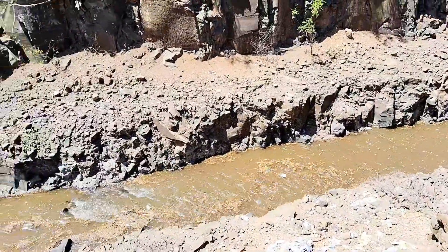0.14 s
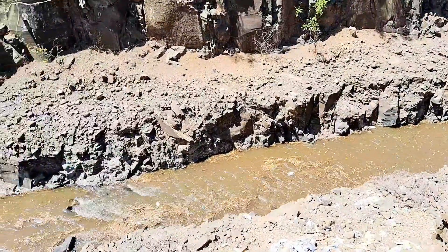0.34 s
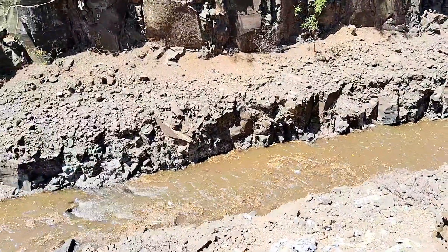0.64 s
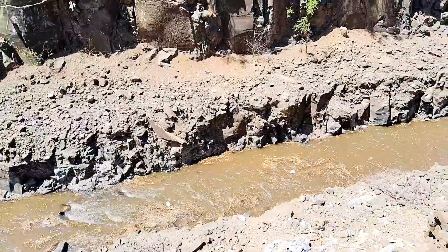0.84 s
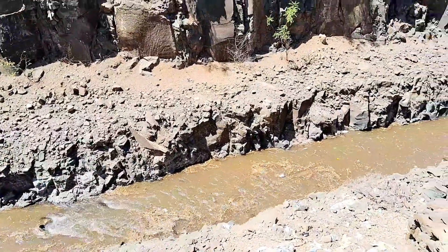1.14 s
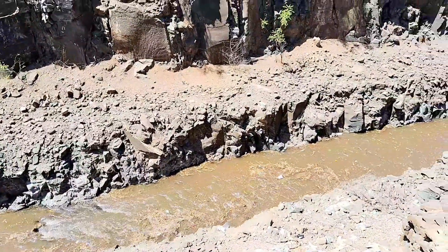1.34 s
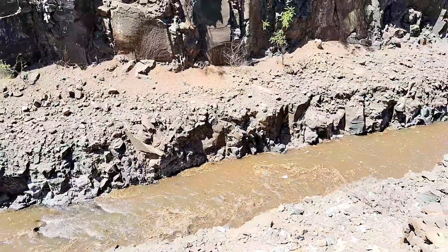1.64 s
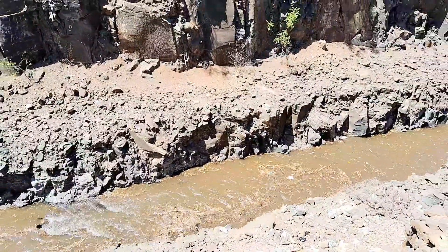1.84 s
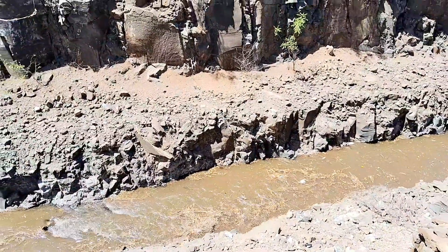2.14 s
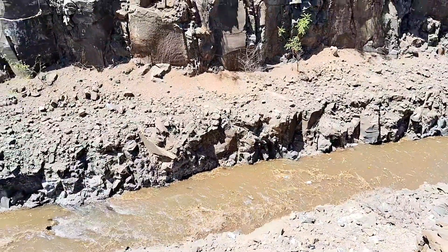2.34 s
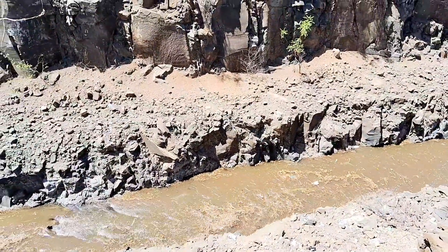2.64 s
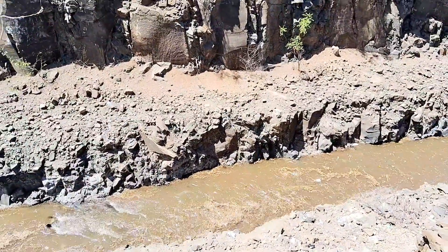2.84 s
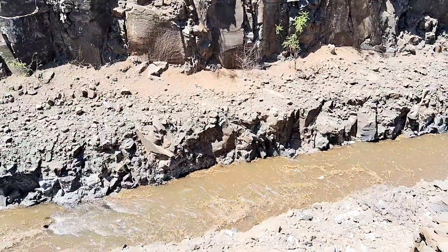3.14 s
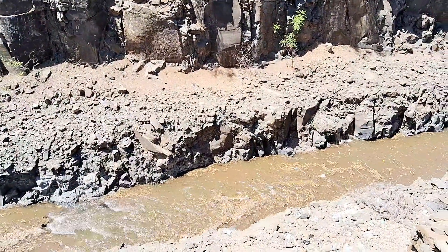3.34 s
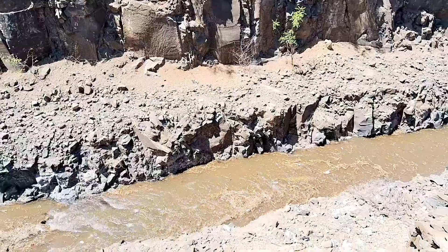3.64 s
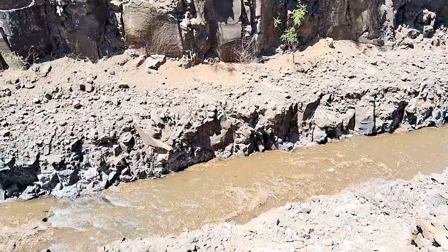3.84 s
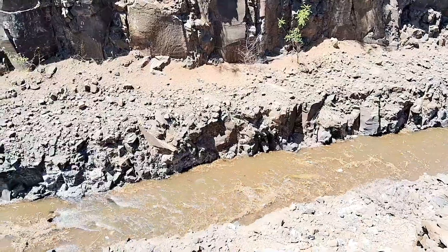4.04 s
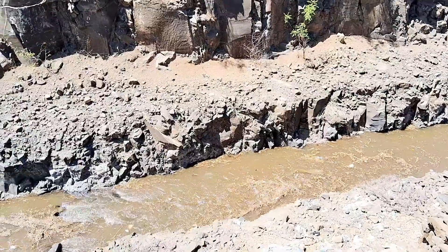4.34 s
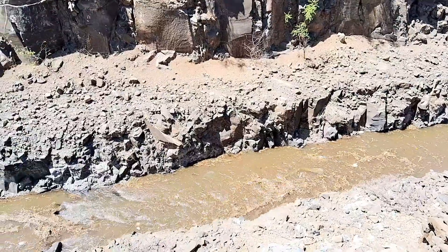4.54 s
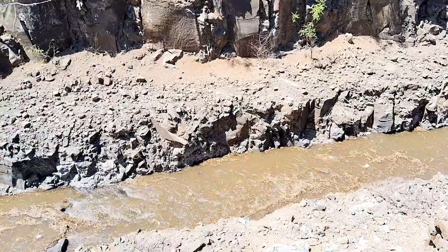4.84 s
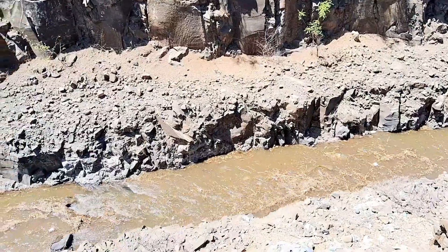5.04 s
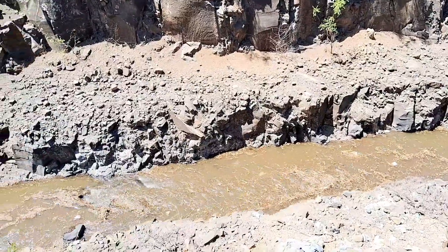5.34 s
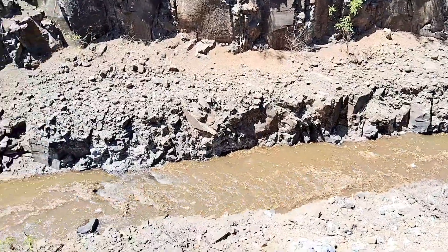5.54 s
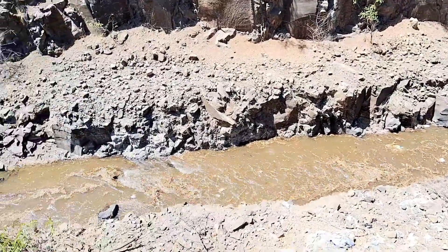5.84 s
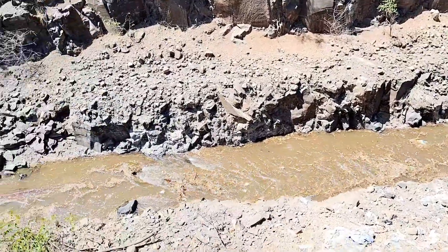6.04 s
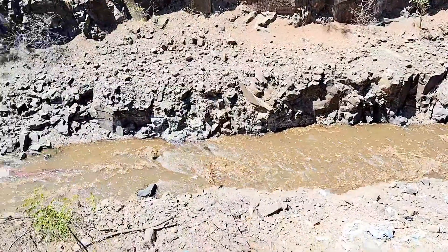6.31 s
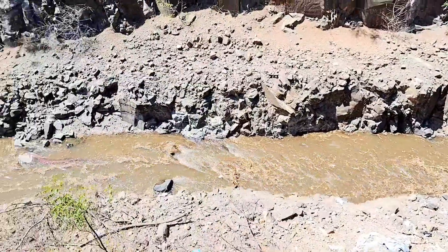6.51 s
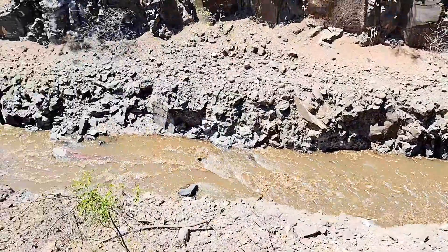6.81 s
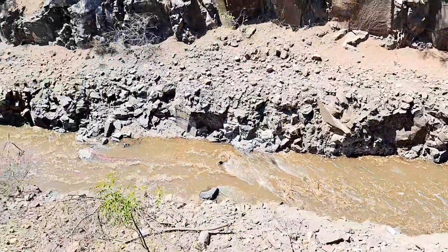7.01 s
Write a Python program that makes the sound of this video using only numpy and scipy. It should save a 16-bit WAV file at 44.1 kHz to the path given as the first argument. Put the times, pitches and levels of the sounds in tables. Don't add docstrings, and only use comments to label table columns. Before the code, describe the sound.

Fast shallow water churns over rocks, full of small ringing bubbles, plops and gritty ticks, heard from the bank of a rock-cut canal. At 1.5 seconds a finger covers the right side of the hand-held microphone: that side turns louder, hollow and rumbling. A hard thump hits at 3.7, the level dips for about a second, then low creaks follow to the end.

```python
import sys
import numpy as np
from scipy import signal
from scipy.fft import rfft, irfft
from scipy.io import wavfile
from scipy.ndimage import map_coordinates

SR = 44100
rng = np.random.default_rng(int(sys.argv[2]) if len(sys.argv) > 2 else 0)


def wav_out(sig):
    wavfile.write(sys.argv[1], SR, np.round(np.clip(np.atleast_2d(sig).T, -1, 1) * 32767).astype(np.int16))


def voltage_ratio(level):
    return 10 ** (np.asarray(level, float) / 20)


N = 316194

# time_s, level_db
FLOW_DB = [(0, -0.5), (.3, 0.5), (.6, -1), (.9, 0), (1.47, -1), (1.6, 1.6), (2.1, 0.5), (2.65, 2.3),
           (3.2, 0.75), (3.55, 1.5), (4.15, 3), (4.6, 2.4), (5.2, 1), (5.5, 0.4), (6.15, 2.4), (6.4, 1),
           (6.68, 2.7), (7.17, 1.1)]
GURGLE_FOLLOWS, RUSH_FOLLOWS, SPRAY_FOLLOWS = 0.58, 0.6, 0.47
# freq_hz, density_db_per_hz
RIVER_DB = [(30, -103), (65, -79.5), (130, -85.5), (210, -91.5), (330, -87), (500, -91.5), (750, -84),
            (1100, -85.5), (1700, -89.5), (2800, -93.5), (4500, -96.5), (8000, -103.0), (12500, -103.6),
            (15500, -110.2)]
# freq_hz, common_share_0_to_1
COMMON_SHARE = [(150, 0.0), (330, .8), (800, .86), (1500, .6), (2600, .48), (4200, .08)]
# pitch_hz, level_db
BUBBLE_DB = [(380, -3), (540, 1), (680, 3), (850, -0.5), (1050, 2.5), (1500, 1.1), (3000, 1)]
# start_s, peak_db, pitch_hz
PLOPS = [(0.082, -34, 702), (0.346, -31, 1450), (0.395, -36.5, 815), (0.472, -38, 744), (0.492, -51, 840),
         (0.596, -39, 770), (0.693, -35.5, 650), (0.727, -35.5, 723), (0.756, -44, 745), (0.854, -38, 660),
         (1.238, -34.5, 870), (1.596, -33, 742), (1.756, -32, 805), (2.937, -35, 820), (3.63, -40, 2350),
         (4.095, -30.5, 2320), (4.573, -76, 826), (5.132, -37.5, 676), (5.175, -31.5, 830),
         (5.224, -34.5, 660), (5.265, -34, 890), (5.512, -34.5, 2470), (2.365, -34, 720),
         (2.503, -36.5, 760), (2.73, -42, 510), (6.717, -35, 954), (6.729, -38, 665), (6.866, -36, 1950),
         (6.995, -38, 1890)]
# start_s, peak_db, centre_hz, width_octaves, t60_s
TICKS = [(5.783, -45, 11000, 0.74, 0.019), (6.153, -35, 2300, 1.5, 0.0074), (6.191, -37, 1500, 1.2, 0.022),
         (6.199, -34, 1600, 1.4, 0.0086), (6.2025, -20.5, 1780, 0.25, 0.0094),
         (6.628, -39, 13500, .25, 0.02), (6.628, -40, 6540, 6.2, 0.067), (6.637, -39.5, 5100, 0.53, 0.034),
         (6.641, -51.5, 6600, 6, 0.4), (6.698, -42, 10700, 0.32, 0.018), (7.14, -42.5, 1910, 1.3, 0.021)]
# start_s, peak_db
DROPS = [(0.266, -37), (2.725, -54), (3.005, -43), (3.021, -45), (3.56, -47), (4.042, -40), (4.055, -39),
         (4.942, -42), (5.42, -41), (5.9, -41), (6.657, -49), (6.96, -41)]
DROP_HZ, DROP_OCTAVES, DROP_T60_S = 7700, 2.6, 0.0084
# time_s, seal_0_to_1, extra_path_samples
GRIP = [
    (0, 0.0, 10.7),
    (1.5, 0.22, 12.3),
    (1.56, 0.71, 10.8),
    (4.0, 0.72, 10.5),
    (5.5, 0.77, 8.8),
    (6.5, 0.56, 6.4),
    (7.17, 0.57, 3),
]
# freq_hz, gain_db re open port
SHADED_DB = [(250, -0.5), (450, 1), (700, 2.5), (950, 3.5), (1250, -2.5), (1500, 6), (1900, 3), (2400, 6),
             (2900, 0.5), (3500, -4), (4200, -19), (5000, -10), (7000, -30.5), (12000, -17)]
# freq_hz, gain_db re open port
SEALED_DB = [(250, 10), (450, 4.5), (700, 5), (950, 6.5), (1250, -0.7), (1500, 8), (1900, 14), (2400, 13.5),
             (2900, 6), (3500, -4), (4200, -15.5), (5000, -14), (7000, -33), (12000, -18)]
# time_s, level_db
TREMOR_DB = [(1.5, -86), (1.54, -43), (1.75, -43.5), (2.6, -43), (3.6, -42.5), (4.3, -41.5), (5.0, -41.5),
             (5.4, -43), (5.9, -42), (6.4, -42.5), (6.85, -39.5), (7.17, -44.5)]
# freq_hz, density_db_per_hz
SKIN_DB = [(25, -10), (40, -21), (60, 3), (85, 1.5), (120, -0.5), (150, -5.5), (190, -18), (260, -23)]
# start_s, peak_db, settling_pitch_hz, length_s, contact_stiffness_ms
THUMPS = [(1.722, -29.5, 75, 0.035, 0.52), (1.829, -30.5, 70, 0.035, 1.5), (3.694, -21, 130, .006, 1.4),
          (3.7027, -.4, 116, .0145, 3.6), (3.7216, -11.5, 106, .0095, .3), (4.719, -43, 95, 0.022, 1.9),
          (4.826, -23, 95, 0.014, 1.6), (5.225, -32.5, 95, 0.028, 1.2), (5.569, -24.5, 106, 0.019, 1.7),
          (5.59, -25.5, 95, 0.018, 0.64), (6.14, -32, 105, 0.01, 0.88), (6.173, -27, 90, 0.0069, 1.7),
          (7.111, -23, 121.5, 0.014, 2.4), (7.129, -24.5, 70, 0.022, 0.98)]
# start_s, peak_db, pitch_hz, length_cycles
NAIL = [
    (3.7018, -15, 1250, 8.0),
]
# start_s, length_s, rest_rate_hz, top_rate_hz, level_db
CREAKS = [
    (5.039, 0.064, 78.6, 90, -30),
    (5.065, .11, 188, 209, -32),
    (5.165, 0.051, 136, 166, -30.5),
    (5.495, 0.09, 138, 176, -33.5),
    (5.983, 0.15, 104.6, 179.4, -25),
    (6.542, 0.123, 92.3, 104.3, -21.5),
    (6.653, .158, 101, 213, -20.5),
    (7.1, 0.12, 134.4, 138, -28),
]
SLIP_PARTIALS_DB = [2, -1, -2]
SLIP_ARCH = 4.38
SLIP_ATTACK_S, SLIP_RELEASE_S, SLIP_SWELL_DB = 0.027, 0.015, 1.0
# freq_hz, gain_db
HOLLOW_DB = [(70, 1), (95, -2), (125, 2), (200, -10), (300, -18.5), (420, -26), (650, -46)]
DRONE_HZ, DRONE_WIDTH_HZ, DRONE_DB = 70, 9.0, -75.5
WHITE_DB = 10 * np.log10(2 / SR)
DUCK_THRESHOLD, DUCK_DELAY_S = 0.3, 0.03
DUCK_DB, DUCK_ATTACK_S, DUCK_HOLD_S, DUCK_RELEASE_S = -4.5, 0.045, 1.07, 0.21
CUTOFF_HZ = 16400


def rms_one(x):
    return x / np.sqrt(np.mean(x ** 2) + 1e-20)


def in_time(rows):
    time_s, *columns = np.transpose(rows)
    return [np.interp(np.arange(N) / SR, time_s, c) for c in columns]


def at_hz(points, hz):
    freq_hz, value = np.transpose(points)
    return np.interp(np.log(hz + 1e-9), np.log(freq_hz), value)


def bandpass(x, edges_hz):
    return signal.sosfilt(signal.butter(2, edges_hz, "band", fs=SR, output="sos"), x)


def colour(x, spectrum_db):
    log_gain = at_hz(spectrum_db, np.linspace(0, SR / 2, 8193)) * np.log(10) / 20
    cepstrum = irfft(log_gain)
    cepstrum[1:8192] *= 2
    cepstrum[8193:] = 0
    impulse = irfft(np.exp(rfft(cepstrum)))
    return signal.fftconvolve(x, impulse)[:N]


def drift(rate_hz):
    r = np.exp(-80 * np.pi * rate_hz / SR)
    noise = rng.standard_normal(N // 40 + 2002)
    slow = signal.lfilter([1], [1, -2 * r, r * r], noise)[2000:]
    return np.interp(np.arange(N) / 40, np.arange(len(slow)), rms_one(slow))


def add(track, start_s, sound):
    i = round(start_s * SR)
    track[i:i + len(sound)] += sound[:N - i]


def grains(per_s, spread_db):
    sizes = voltage_ratio(spread_db * np.minimum(rng.exponential(1, N), 4)) * rng.choice([-1, 1], N)
    return sizes * (rng.random(N) < per_s / SR)


def bubble(hz, cycles, rise):
    t = np.arange(int(cycles / hz * SR)) / SR
    life = t * hz / cycles
    attack = np.minimum(t * hz / 3.5, 1)
    return np.sin(2 * np.pi * hz * t * (1 + rise * life)) * voltage_ratio(-60 * life) * attack


def churn():
    (flow_db,) = in_time(FLOW_DB)
    follows = (GURGLE_FOLLOWS, RUSH_FOLLOWS, SPRAY_FOLLOWS)
    gurgle_db, rush_db, spray_db = [k * flow_db + 0.5 * drift(4.0) for k in follows]
    white = rng.standard_normal((2, 3, N))
    spatter = signal.lfilter([1], [1, -0.988], np.abs(grains(per_s=19, spread_db=5.0)))
    edges_hz = 30 * 2 ** np.arange(0, 9.6, 0.5)
    patch, out = drift(9), 0
    for k, (low, high) in enumerate(zip(edges_hz, np.minimum(edges_hz[1:], 21000))):
        common, left, right = bandpass(white[k % 2], [low, high])
        hz = np.sqrt(low * high)
        rush = at_hz([(900, 0), (1500, 1), (2600, 1), (4000, 0)], hz)
        spray = at_hz([(2600, 0), (4000, 1)], hz)
        patch = 0.6 * patch + 0.8 * drift(14)
        swell_db = (2 - rush - spray) * gurgle_db + rush * rush_db + spray * spray_db
        flutter_db = (1.53 - 0.54 * spray) * patch + 0.54 * drift(28)
        gain = voltage_ratio(swell_db + flutter_db) * (1 + 0.48 * spray * spatter)
        alike = np.clip(at_hz(COMMON_SHARE, hz), 0, 1)
        same, own = np.sqrt(alike), np.sqrt(1 - alike)
        out = out + gain * np.array([same * common + own * left, same * common + own * right])
    return out


def bubbles():
    born, dealt = grains(per_s=550, spread_db=2.0), rng.integers(0, 14, N)
    rings = np.zeros(N)
    for k, hz in enumerate(np.geomspace(380, 3000, 14)):
        ring = signal.oaconvolve(born * (dealt == k), bubble(hz, cycles=23.7, rise=0.094))[:N]
        rings += ring * np.sqrt(hz) * voltage_ratio(at_hz(BUBBLE_DB, hz))
    return voltage_ratio(-12.0 + 0.96 * in_time(FLOW_DB)[0]) * rms_one(rings)


def plops():
    out = np.zeros(N)
    for start_s, peak_db, hz in PLOPS:
        add(out, start_s - 0.003, voltage_ratio(peak_db - 7.0) * bubble(hz, cycles=55.0, rise=0.078))
    return out


def ticks():
    out, t = np.zeros(N), np.arange(SR // 4) / SR
    rows = TICKS + [(s, db, DROP_HZ, DROP_OCTAVES, DROP_T60_S) for s, db in DROPS]
    for start_s, peak_db, hz, octaves, t60_s in rows:
        edges_hz = np.minimum(hz * 2 ** (np.array([-0.5, 0.5]) * octaves), 15000)
        puff = rms_one(bandpass(rng.standard_normal(len(t)), edges_hz))
        add(out, start_s, voltage_ratio(peak_db - 60 * t / t60_s) * np.minimum(t / 0.0015, 1) * puff)
    return out


def thumps():
    out, t = np.zeros(N), np.arange(SR // 12) / SR
    for start_s, peak_db, hz, length_s, stiff_ms in THUMPS:
        turns = hz * (t + stiff_ms / 1000 * (1 - np.exp(-t / 0.002)))
        swing = (1 - np.exp(-t / 0.00085)) * np.exp(-(t / length_s) ** 2)
        add(out, start_s, voltage_ratio(peak_db) * swing * np.sin(2 * np.pi * turns))
    return signal.sosfilt(signal.butter(6, 500, fs=SR, output="sos"), out)


def nail():
    out = np.zeros(N)
    for start_s, peak_db, hz, cycles in NAIL:
        add(out, start_s, voltage_ratio(peak_db) * bubble(hz, cycles, rise=-0.12))
    return out


def creaks():
    out, uneven = np.zeros(N), 1 + 0.022 * drift(45)
    wobble = voltage_ratio([1.3 * drift(30), 2.2 * drift(30), 3.0 * drift(30)])
    for start_s, length_s, rest_hz, top_hz, level_db in CREAKS:
        t = np.arange(int(min(length_s, N / SR - start_s) * SR)) / SR
        at = round(start_s * SR) + np.arange(len(t)) - 1
        arch = np.sin(np.pi * t / length_s) ** SLIP_ARCH
        hz = (rest_hz + (top_hz - rest_hz) * arch) * uneven[at]
        phase = 2 * np.pi * np.cumsum(hz) / SR
        fade = np.minimum(1, np.minimum(t / SLIP_ATTACK_S, (length_s - t) / SLIP_RELEASE_S))
        shape = fade * voltage_ratio(level_db + SLIP_SWELL_DB * (t / length_s - 3))
        slips = np.zeros(len(t))
        for k, partial_db in enumerate(SLIP_PARTIALS_DB):
            gain = voltage_ratio(partial_db + at_hz(HOLLOW_DB, (k + 1) * hz)) * wobble[k, at]
            slips += gain * np.cos((k + 1) * phase - 0.35 * k)
        add(out, start_s, shape * slips)
    return out


def tremor():
    (level_db,) = in_time(TREMOR_DB)
    pushes = grains(per_s=600, spread_db=2.0)
    rumble = colour(pushes, [(9.5, -31)] + SKIN_DB + [(450, -56), (1500, -100)])
    return voltage_ratio(level_db + 0.3 * drift(19)) * rms_one(rumble)


def drone():
    r, w = np.exp(-np.pi * DRONE_WIDTH_HZ / SR), 2 * np.pi * DRONE_HZ / SR
    moan = signal.lfilter([1, 0, -1], [1, -2 * r * np.cos(w), r * r], rng.standard_normal(N))
    return voltage_ratio(DRONE_DB) * rms_one(moan)


def scene():
    seal, lag_samples = in_time(GRIP)
    water = churn() + bubbles()
    river = np.array([voltage_ratio(-WHITE_DB - 1.4) * colour(side, RIVER_DB) + plops() for side in water])
    left, right = river + ticks() * [[1], [0.7]]
    right = map_coordinates(right, [np.arange(N) - lag_samples], order=3)
    right = signal.sosfilt(signal.butter(3, 190, "high", fs=SR, output="sos"), right)
    seal = np.clip(seal, 0, 1)
    right = (1 - seal) * colour(right, SHADED_DB) + seal * colour(right, SEALED_DB)
    skin = thumps() + nail() + creaks() + tremor()
    return np.array([left + drone(), right + skin])


def band_limit(x):
    return signal.sosfilt(signal.butter(12, 15730, fs=SR, output="sos"), x)


def record(dry):
    first_over = np.argmax(np.abs(dry).max(axis=0) > DUCK_THRESHOLD)
    since_s = (np.arange(N) - first_over) / SR - DUCK_DELAY_S
    recovery = 1 - (since_s - DUCK_HOLD_S) / DUCK_RELEASE_S
    down = np.clip(np.minimum(since_s / DUCK_ATTACK_S, recovery), 0, 1)
    low_pass = signal.cheby2(14, 60, CUTOFF_HZ, fs=SR, output="sos")
    mix = signal.sosfilt(low_pass, dry * voltage_ratio(DUCK_DB * down))
    return band_limit(mix)


dry = scene()
out = record(dry)
wav_out(out)
```